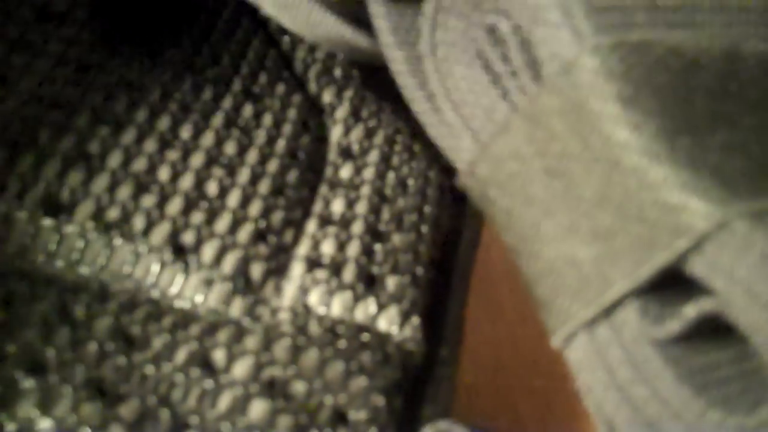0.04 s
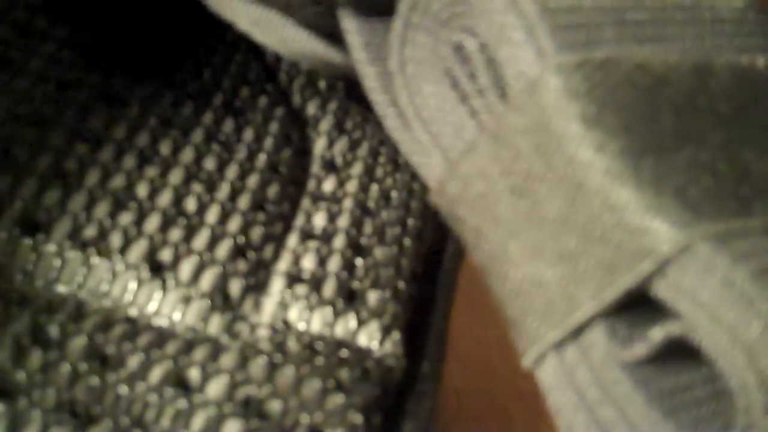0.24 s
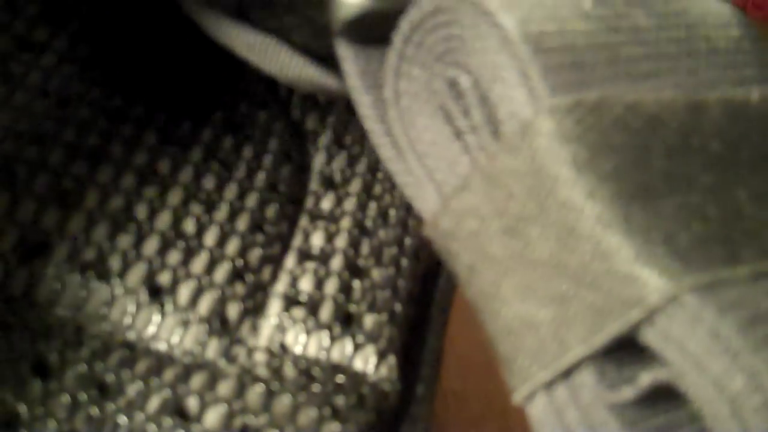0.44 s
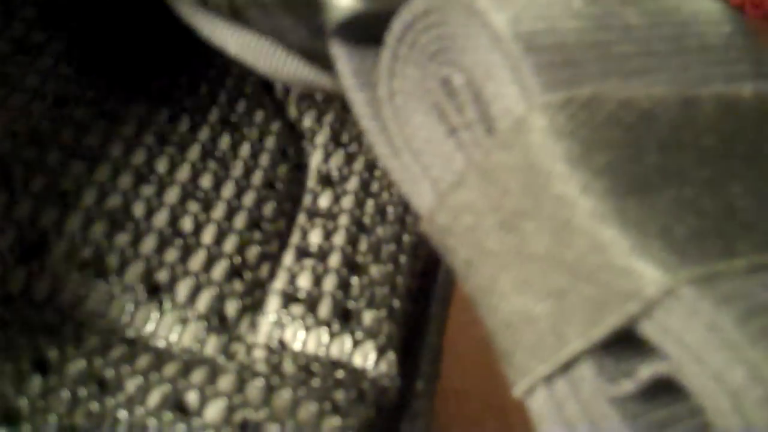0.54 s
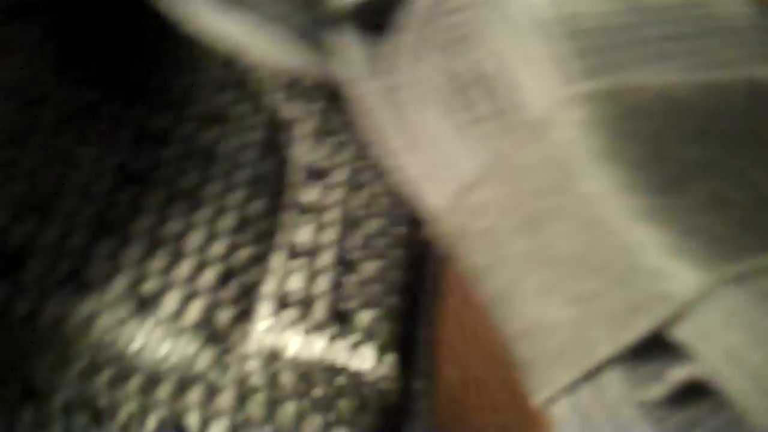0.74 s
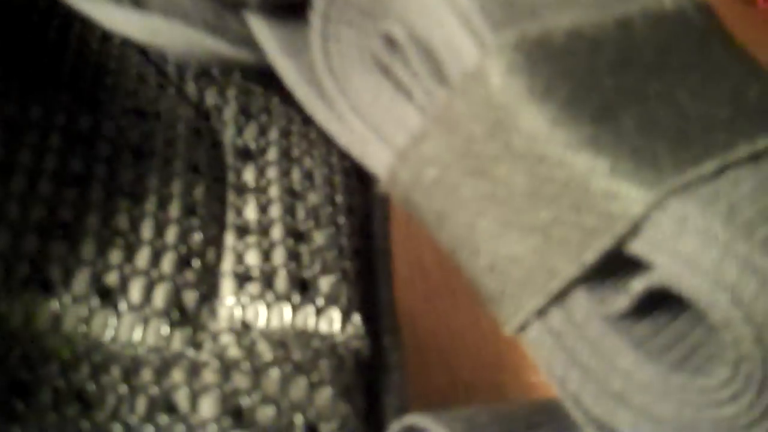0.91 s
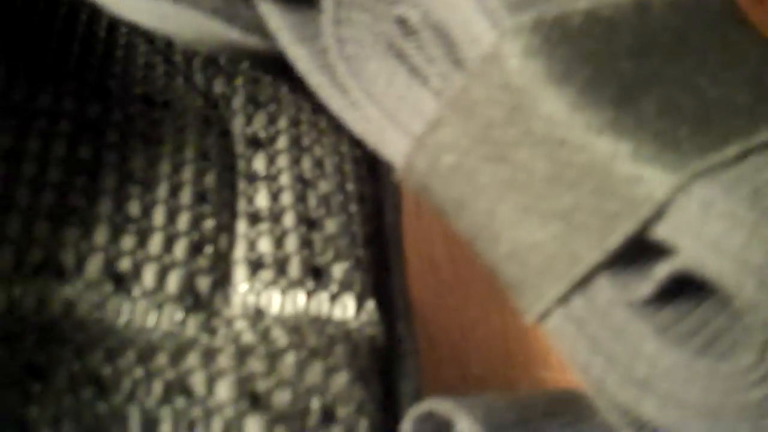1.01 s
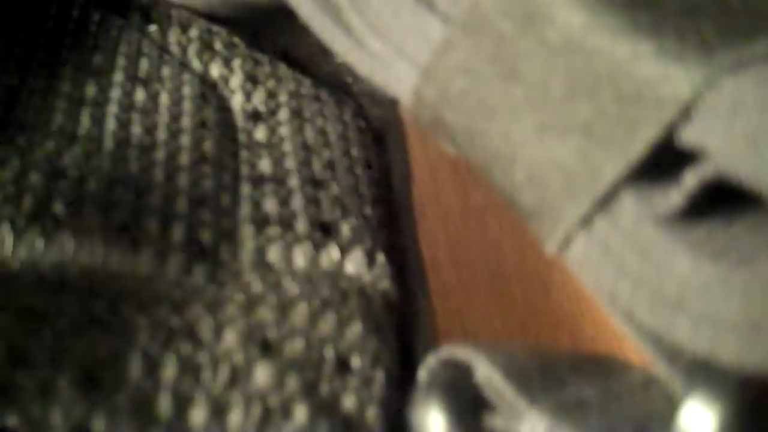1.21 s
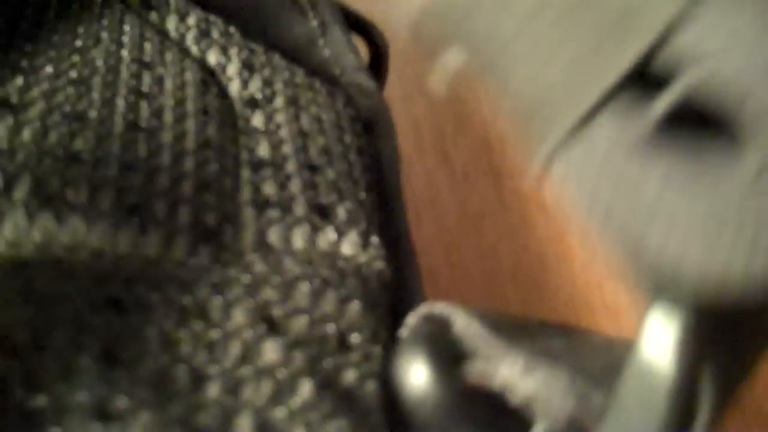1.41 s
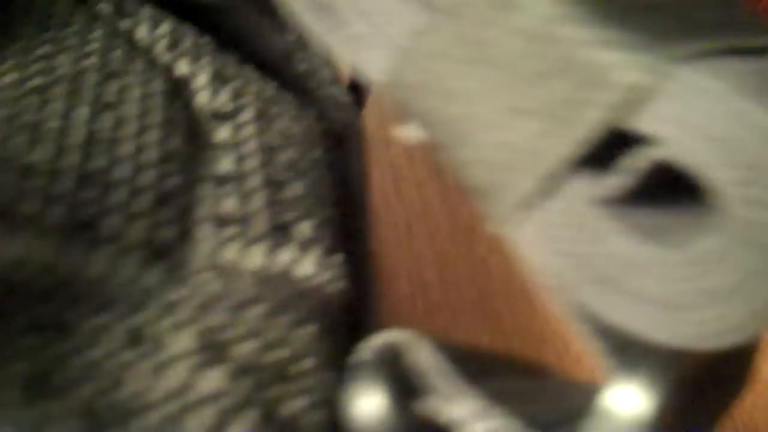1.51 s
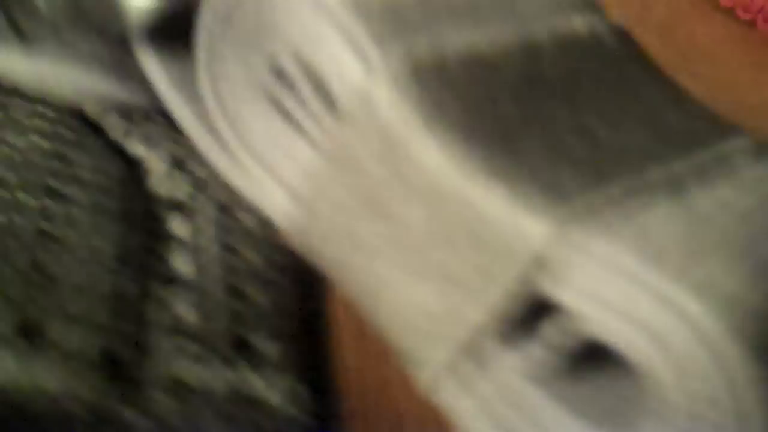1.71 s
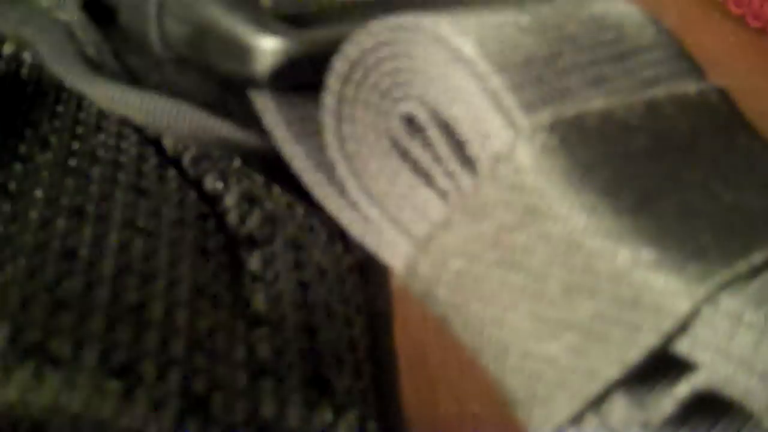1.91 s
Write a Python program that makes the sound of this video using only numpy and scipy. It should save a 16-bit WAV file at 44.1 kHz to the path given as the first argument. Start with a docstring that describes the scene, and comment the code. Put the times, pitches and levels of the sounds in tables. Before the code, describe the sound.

Stiff nylon fabric crinkles in uneven bursts as hands turn a bag over right by the microphone. Sharp crackles and short scrapes come first, then quieter rubbing and a last knock, in a room with little echo.

```python
"""A nylon bag with webbing straps is turned over in the hands, close to a small stereo microphone.
Creases snap, with a few dull knocks among them, and the weave sticks and slips in short runs of catches.
Every catch sizzles, cracks and thumps the bag's panel. Underneath, fibres flick past each other
in a soft rubbing sound. The room echoes faintly, and the sharpest catches overload the recorder."""
import sys
import numpy as np
from scipy import signal
from scipy.fft import rfft, irfft, next_fast_len
from scipy.io import wavfile

SR = 44100
rng = np.random.default_rng(int(sys.argv[2]) if len(sys.argv) > 2 else 0)


def unload_wav(signal):
    """Save mono or channel-first audio to the path in sys.argv[1] as 16-bit WAV at rate SR, clipped to [-1, 1]."""
    wavfile.write(
        sys.argv[1],
        SR,
        np.round(np.clip(np.atleast_2d(signal).T, -1, 1) * 32767).astype(np.int16),
    )


N = 85995

# single sharp snaps, a few dull knocks and an opening thump: t/s, sizzle/dB, crack/dB, thump/dB
SNAPS_AND_KNOCKS = [(0.0006, -38, -32.5, -23), (0.132, -54, -33, -40), (0.1715, -32, -36, -45),
                    (0.218, -14, -16.5, -34.5), (0.2429, -11.5, -11.5, -29.5), (0.2806, -18.5, -18, -42),
                    (0.2864, -18, -11.5, -37.5), (0.337, -16.5, -14, -31), (0.4383, -13, -12, -29),
                    (0.453, -18.5, -15.5, -58), (0.4682, -16, -22, -54), (0.482, -15, -22, -49),
                    (0.534, -22, -40, -36), (0.5512, -12.5, -9.5, -38), (0.5668, -21, -11, -20.5),
                    (0.6024, -8.5, -22, -25), (0.615, -23, -23.5, -45), (0.6467, -18, -20, -27.5),
                    (0.6872, -25.5, -29, -56), (0.691, -29, -21.5, -33), (0.7046, -22, -42, -29.5),
                    (0.7368, -26, -25, -25), (0.7377, -16, -44, -27), (0.774, -17, -46, -41),
                    (0.7854, -24, -34, -48), (0.7938, -25, -26, -40), (0.806, -34, -28, -21),
                    (0.819, -26, -30, -31), (0.8643, -17, -33, -27), (0.896, -20, -29, -31),
                    (0.9289, -20.5, -35, -40.5), (0.9329, -25, -56, -43), (0.9686, -24, -32, -34.5),
                    (1.136, -18.5, -33, -60), (1.1532, -29, -42, -42.5), (1.1603, -20, -39, -53),
                    (1.1841, -21, -34, -52), (1.1908, -28, -35, -38.5), (1.2205, -21, -60, -41),
                    (1.3238, -25.5, -44, -55.5), (1.3667, -77, -55, -42.5), (1.388, -56, -71, -38),
                    (1.6569, -22.5, -14.5, -18), (1.784, -31, -45, -48)]
# the weave slipping: t/s, length/s, sizzle/dB, crack/dB, thump/dB
WEAVE_SLIPS = [(0.4585, 0.0047, -16, -19.5, -33), (0.4875, 0.0081, -15, -16, -27.5),
               (0.5025, 0.0039, -9.5, -16, -21.5), (0.5255, 0.0065, -17.5, -15.5, -27.5),
               (0.5592, 0.0032, -7.5, -21.5, -20.5), (0.568, 0.011, -26, -27, -36),
               (0.5808, 0.0068, -12.5, -18, -42), (0.591, 0.0065, -16.5, -18.5, -27.5),
               (0.7075, 0.0079, -16.5, -15, -22.5), (0.767, 0.0033, -4.5, -17, -20.5),
               (0.8315, 0.012, -12, -24.5, -26), (0.845, 0.0049, 0, -14, -14.5),
               (0.857, 0.0035, -4, -27, -12.5), (0.869, 0.0069, -10.5, -31, -23.5),
               (0.878, 0.0073, -13, -46, -32.5), (0.902, 0.002, -14, -30, -26.5),
               (0.9095, 0.0026, -18.5, -29.5, -23.5), (1.045, 0.0067, -24, -27.5, -27),
               (1.057, 0.0075, -9.5, -43, -33), (1.069, 0.0085, -19, -26.5, -37),
               (1.085, 0.0086, -12.5, -31.5, -30.5), (1.1635, 0.01, -19, -36, -39),
               (1.212, 0.0055, -7.5, -27, -25.5), (1.2255, 0.0036, -18.5, -34.5, -39),
               (1.235, 0.0074, -4.5, -23.5, -19.5), (1.248, 0.0068, -11, -31.5, -21.5),
               (1.2595, 0.024, -15, -27, -28), (1.495, 0.0088, -38, -50.5, -44),
               (1.592, 0.02, -40, -40, -32), (1.812, 0.0043, -29.5, -32, -33.5),
               (1.881, 0.0082, -33, -35, -34), (1.927, 0.0073, -28.5, -33, -61)]
# the cloth being crumpled: start/s, end/s, sizzle/dB, crack/dB, thump/dB
CRUMPLINGS = [(0.443, 0.619, -38.5, -35, -52), (0.685, 0.719, -41, -41, -44.5),
              (0.825, 0.944, -58, -47, -46.5), (1.042, 1.103, -16.5, -25, -66)]
# tone as the grip changes: t/s, fizz relative to sizzle/dB, bass cut/Hz, panel pitch/Hz, panel peak/dB
GRIP_TONE = [(.22, -5.5, 270, 564, 10), (.46, -2, 277, 553, 9.5), (.61, -0.5, 222, 553, 10),
             (.74, -13, 198, 538, 5.5), (0.767, -15, 180, 326, 8), (.806, -7.5, 304, 780, 10.5),
             (0.851, -13, 49.6, 500, 4.5), (1.08, -7, 113, 527, 5), (1.185, -7, 219, 400, 0),
             (1.238, -11, 35, 160, 0), (1.66, -24, 135, 1064, 10.5), (1.78, -3, 162, 710, 11)]
# the tone of each of the four parts of a catch: f/Hz, level/dB
SIZZLE_TONE = [(1500, -39.5), (3500, -17), (4900, -8.5), (6200, -4.5), (7400, 5), (8300, -3), (9400, -11),
               (11000, -16), (15000, -45)]
CRACK_TONE = [(700, -20), (1500, -10), (2300, 1), (3200, 6.5), (4400, 1), (7000, 0.5), (10000, -20),
              (15000, -31.5)]
THUMP_TONE = [(25, -19), (70, 0), (160, 2.5), (330, -3), (560, 0), (780, -7), (1200, 1), (1800, -6.5),
              (4000, -37.5)]
FIZZ_TONE = [(5000, -30), (8500, -7), (10000, 7), (12000, 1.5), (14200, -4.5), (15200, -31.5)]
# added to the levels of those parts: sizzle/dB, crack/dB, thump/dB, fizz/dB
PART_TRIMS_DB = (1, -0.0069, -0.31, -2.7)
# how the rubbing rises and falls: t/s, rumble/dB, dull rub/dB, hiss/dB
RUBBING_LEVELS = [(0, -49, -50.5, -44.5), (.43, -55.5, -48.5, -45), (.62, -48.5, -56, -44.5),
                  (.72, -44, -55.5, -69), (1.0, -50.5, -52.5, -56), (1.29, -55.5, -61.5, -47),
                  (1.399, -63.5, -63.5, -63), (1.55, -49.5, -56.5, -50), (1.63, -52, -43, -40),
                  (1.69, -51, -47.5, -53), (1.79, -48, -44.5, -42.5), (1.95, -63, -40.5, -47)]
# the tone of each of the three parts of the rubbing: f/Hz, level/dB
RUMBLE_TONE = [(25, -12), (60, -5.5), (150, -9.5), (280, 0), (420, -6.5), (900, -25.5)]
RUB_TONE = [(200, -24), (420, -12), (560, -2), (800, -2), (1150, -0.5), (1900, -10), (4000, -29)]
HISS_TONE = [(900, -21.5), (2000, -2), (3400, 1), (5000, -1), (7500, 6.5), (9500, -7), (13500, -16),
             (16000, -61)]
# what the microphone's two sides pick up: f/Hz, left over right/dB, likeness (1 = alike)
CATCH_STEREO = [(59.4, 8.5, 0.49), (153, 8.5, 0.39), (290, 2.5, 0.66), (576, 2.5, 1), (1220, 3, 0.17),
                (2890, 10, 0.92), (5950, 5.5, 0.97), (7980, 4.5, 1), (9200, 5, 0.69), (12700, 18.5, 0.4)]
RUB_STEREO = [(59.6, 2.5, 0.92), (300, -0.5, 0.99), (734, -0.5, 1), (1400, 1.5, 0.63), (2600, 5, 0.7),
              (7540, 4.5, 0.17), (14000, 9.5, 0.2)]

BLOCK = 4096  # samples set aside for one snap or slip
SNAP_S, SHORTEST_COUNTED_S = 0.00066, 0.0025  # anything briefer gets the energy of the second length
CATCHES_PER_S, CATCH_SPREAD_DB, SWELL_POWER = 2000, 9.5, 0.28
SOFT_EDGE_S, SOFT_EDGE_DB = 0.003, -33.5  # faint clicks soften the start and end of each run
TONE_SPREAD_DB, SMEAR_S = 2, 0.0007  # every fold sounds a little different
RING_DB, RING_T60_S = -15.5, 0.043  # the cloth and nearby things ring on
SMALL_CREASES_PER_S, SMALL_SPREAD_DB = 250, 3
FIBRES_PER_S, FIBRE_SPREAD_DB, FLICKER_DB, FLICKER_HZ = 14000, 3, 2.22, 37
ROOM_DB, ROOM_T60_S = -25.5, 0.18
RIGHT_LAG_MS, PAN_SPREAD_DB = 0.043, 4.5
OVERLOAD_LEVEL, CUTOFF_HZ = 0.8, 14900


def crinkles(events):
    """Each snap, knock or slip is a run of clicks that sets off a sizzle, crack, thump and high fizz."""
    out = np.zeros((2, N + 2 * BLOCK))
    grip_s, *grip_columns = np.transpose(GRIP_TONE)
    for t, length_s, sizzle_db, crack_db, thump_db in events:
        clicks = rfft(catches(length_s)) * fold_smear()
        start = int(np.clip((t - SOFT_EDGE_S - SMEAR_S / 2) * SR + BLOCK, 0, N + BLOCK))
        length_gain = np.sqrt(max(length_s, SHORTEST_COUNTED_S) * SR)
        fizz_db, bass_cut_hz, panel_hz, panel_db = (np.interp(t, grip_s, c) for c in grip_columns)
        parts = [(SIZZLE_TONE, sizzle_db, 1),
                 (CRACK_TONE, crack_db, 1),
                 (THUMP_TONE, thump_db, panel_ring(panel_hz, panel_db)),
                 (FIZZ_TONE, sizzle_db + fizz_db, 1)]
        for (tone, level_db, resonance), trim_db in zip(parts, PART_TRIMS_DB):
            struck = clicks * resonance * tone_filter(tone, BLOCK, TONE_SPREAD_DB, bass_cut_hz)
            ringing = struck * (1 + from_db(RING_DB) * rfft(dying_noise(RING_T60_S, BLOCK)))
            scatter = rfft(dying_noise(t60_s=0.0069, size=BLOCK))
            blurred = struck * scatter / np.sqrt(abs(scatter) + 1e-9)
            pair = to_stereo(ringing, blurred, CATCH_STEREO, PAN_SPREAD_DB * rng.standard_normal())
            out[:, start:start + BLOCK] += from_db(level_db + trim_db) * length_gain * pair
    return out[:, BLOCK:BLOCK + N]


def catches(length_s):
    """The weave sticks and lets go: uneven clicks that swell and fade. Faint ones soften both ends."""
    whole_s = length_s + 2 * SOFT_EDGE_S
    count = max(1, round(whole_s * CATCHES_PER_S))
    at_s = (np.arange(count) + rng.random(count)) / count * whole_s
    at_s[np.argmin(abs(at_s - whole_s / 2))] = whole_s / 2  # one click lands right in the middle
    strength = from_db(CATCH_SPREAD_DB * np.tanh(rng.standard_normal(count)))
    sign = rng.choice([-1, 1], count)
    progress = np.clip((at_s - SOFT_EDGE_S) / length_s, 0, 1)
    swell = abs(np.sin(np.pi * progress)) ** SWELL_POWER
    clicks = np.zeros(BLOCK)
    np.add.at(clicks, (at_s * SR).astype(int), sign * (swell + from_db(SOFT_EDGE_DB)) * strength)
    return unit_energy(clicks)


def fold_smear():
    """Bending waves spread through a fold, so each pitch leaves it at a slightly different moment."""
    hz = np.linspace(0, SR / 2, BLOCK // 2 + 1)
    delay_s = SMEAR_S * np.interp(hz, np.linspace(0, SR / 2, 24), rng.random(24))
    return np.exp(-2j * np.pi * np.cumsum(delay_s) * hz[1])


def panel_ring(pitch_hz, peak_db, width_hz=85):
    """The bag's taut panel rings, boosting the sound near its own pitch."""
    hz = np.linspace(0, SR / 2, BLOCK // 2 + 1) + 1
    return 1 + (from_db(peak_db) - 1) / (1 + 1j * (hz ** 2 - pitch_hz ** 2) / (hz * width_hz))


def small_creases():
    """Small creases give way at random as the cloth is crumpled: a list of their snaps."""
    events = []
    for start_s, end_s, *levels_db in CRUMPLINGS:
        for k in range(int((end_s - start_s) * SMALL_CREASES_PER_S)):
            t = start_s + (k + rng.random()) / SMALL_CREASES_PER_S
            varied_db = np.array(levels_db) + SMALL_SPREAD_DB * rng.uniform(-1, 1)
            events.append((t, SNAP_S, *varied_db))
    return events


def rubbing(tone, gain_db, column):
    """Countless fibres flick past each other as the cloth slides, and the level flickers."""
    size = 2 * next_fast_len(N // 2 + BLOCK)
    flicks = (rng.random((2, size)) < FIBRES_PER_S / SR) * rng.choice([-1, 1], (2, size))
    strength = from_db(FIBRE_SPREAD_DB * np.minimum(rng.exponential(1, (2, size)), 6))
    shared, right_only = rfft(flicks * strength) * tone_filter(tone, size)
    levels = np.transpose(RUBBING_LEVELS)
    level_db = np.interp(np.arange(N) / SR, levels[0], levels[column])
    level_db += FLICKER_DB * wander(FLICKER_HZ)
    pair = to_stereo(shared, right_only, RUB_STEREO)[:, :N]
    return from_db(gain_db + level_db) * np.sqrt(size) * pair


def room_echo(pair):
    """The room answers with a faint, short echo."""
    echoes = [signal.fftconvolve(side, dying_noise(ROOM_T60_S, SR // 2))[:N] for side in pair]
    return from_db(ROOM_DB) * np.array(echoes)


def to_stereo(shared, right_only, stereo_table, pan_db=0):
    """Two spectra become left and right sound; the right is later, mostly softer and partly its own."""
    hz = np.linspace(0, SR / 2, len(shared)) + 1
    table_hz, *columns = np.transpose(stereo_table)
    left_db, likeness = (np.interp(np.log(hz), np.log(table_hz), c) for c in columns)
    lag = np.exp(-2j * np.pi * hz * RIGHT_LAG_MS / 1000)
    right = likeness * shared * lag + np.sqrt(1 - likeness ** 2) * right_only
    right *= from_db(-left_db - pan_db)
    return np.sqrt(2) * unit_energy(irfft(np.array([shared, right])))


def tone_filter(tone, size, spread_db=0, bass_cut_hz=10):
    """A filter that follows a tone table, with random bumps and less bass."""
    hz = np.arange(size // 2 + 1) * SR / size + 1
    table_hz, table_db = np.transpose(tone)
    tone_db = np.interp(np.log(hz), np.log(table_hz), table_db)
    bumps_db = np.interp(hz, np.geomspace(100, 16000, 40), spread_db * rng.standard_normal(40))
    bass_cut = hz ** 2 / np.hypot(hz ** 2, bass_cut_hz ** 2)
    # these steps make the filter ring only after a click, never before it
    cepstrum = irfft(np.log(from_db(tone_db + bumps_db) * bass_cut + 1e-4))
    cepstrum[1:size // 2] *= 2
    cepstrum[size // 2 + 1:] = 0
    return np.exp(rfft(cepstrum))


def dying_noise(t60_s, size):
    """Noise that fades by 60 dB in t60_s seconds."""
    fade = from_db(-60 * np.arange(size) / SR / t60_s)
    return unit_energy(rng.standard_normal(size) * fade)


def wander(hz):
    """A smooth random wobble with a typical size of one."""
    pole = np.exp(-2 * np.pi * hz / SR)
    slow = signal.lfilter([1], [1, -2 * pole, pole * pole], rng.standard_normal(N + SR))[SR:]
    return slow / slow.std()


def from_db(db):
    """Turns decibels into a number to multiply by."""
    return 10 ** (np.asarray(db) / 20)


def unit_energy(x):
    """Scales a sound to an energy of one."""
    return x / np.sqrt(np.sum(x ** 2) + 1e-20)


def scene():
    """Snaps, knocks, slips and crumpling over the soft rubbing."""
    rumble = rubbing(RUMBLE_TONE, gain_db=-3, column=1)
    dull_rub = rubbing(RUB_TONE, gain_db=1, column=2)
    hiss = rubbing(HISS_TONE, gain_db=1.5, column=3)
    snaps_and_knocks = [(t, SNAP_S, *levels_db) for t, *levels_db in SNAPS_AND_KNOCKS]
    bag = crinkles(snaps_and_knocks) + crinkles(WEAVE_SLIPS) + crinkles(small_creases())
    return bag + rumble + dull_rub + hiss + room_echo(bag)


def record(dry):
    """Overload flattens the tallest peaks, then the highest treble is cut away."""
    flattened = dry / (1 + (dry / OVERLOAD_LEVEL) ** 8) ** (1 / 8)
    treble_cut = signal.ellip(10, .1, 70, CUTOFF_HZ, fs=SR, output="sos")
    return signal.sosfilt(treble_cut, flattened)


dry = scene()
out = record(dry)
unload_wav(out)
```